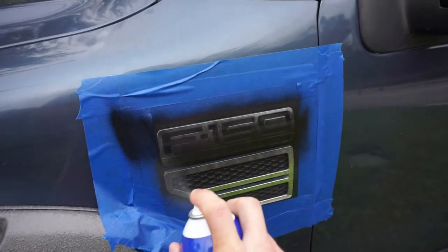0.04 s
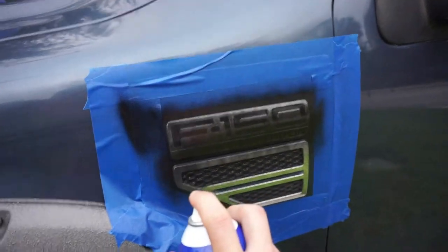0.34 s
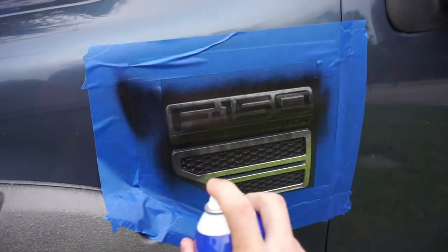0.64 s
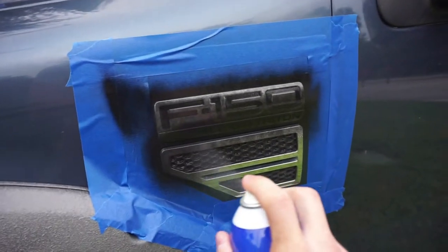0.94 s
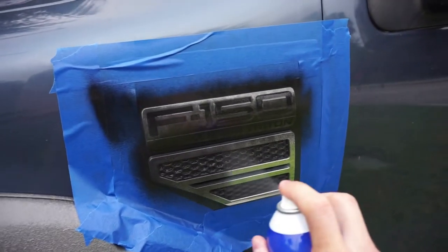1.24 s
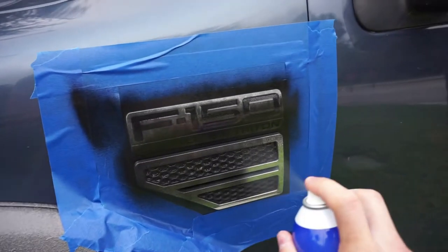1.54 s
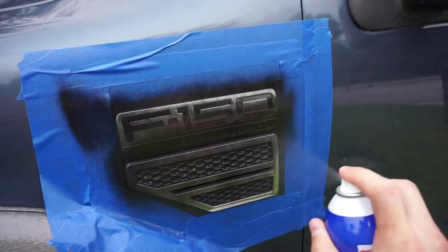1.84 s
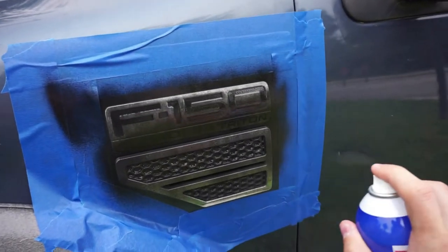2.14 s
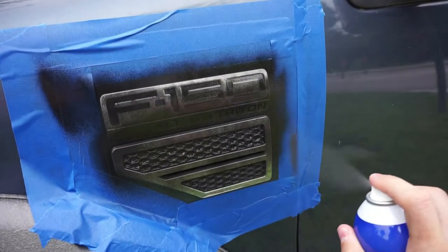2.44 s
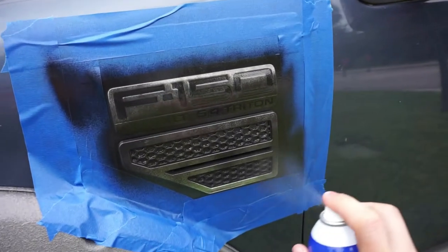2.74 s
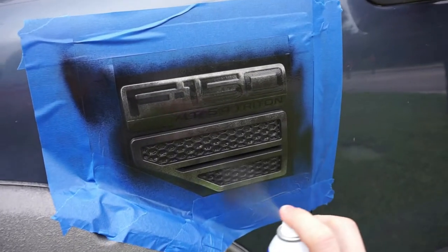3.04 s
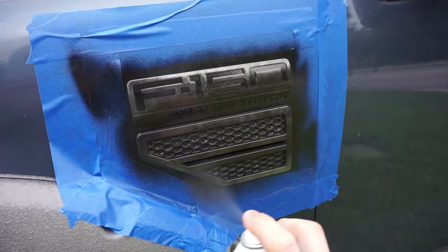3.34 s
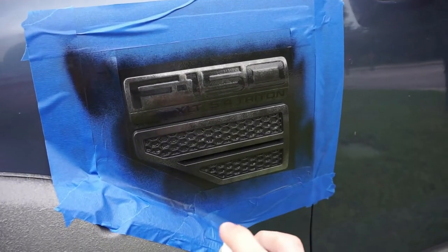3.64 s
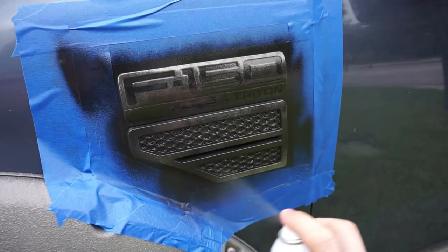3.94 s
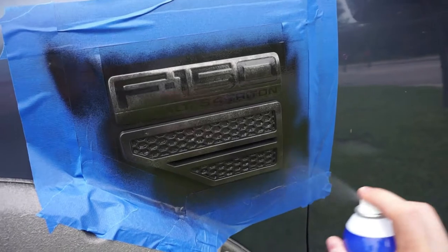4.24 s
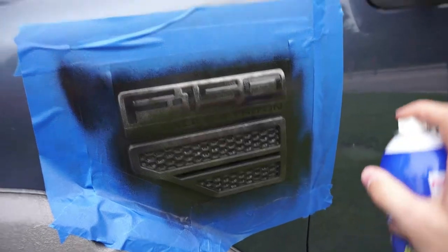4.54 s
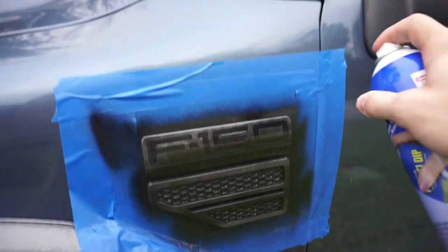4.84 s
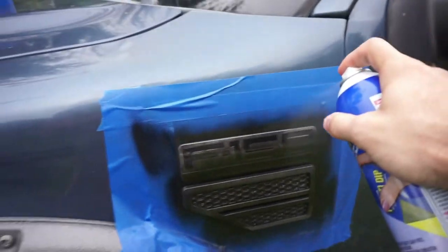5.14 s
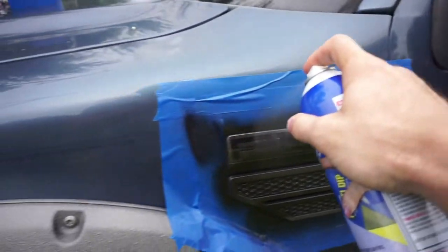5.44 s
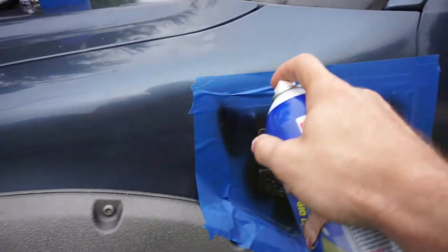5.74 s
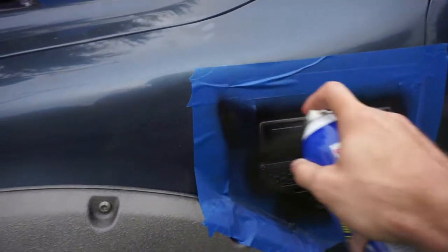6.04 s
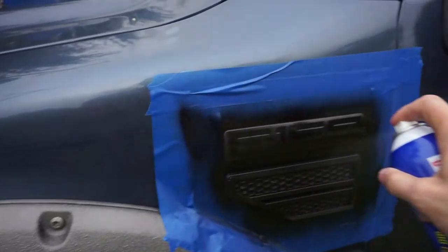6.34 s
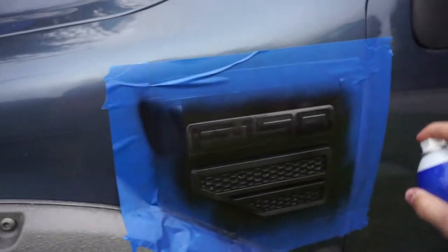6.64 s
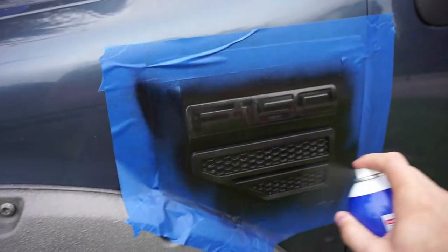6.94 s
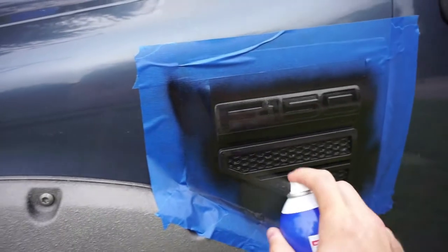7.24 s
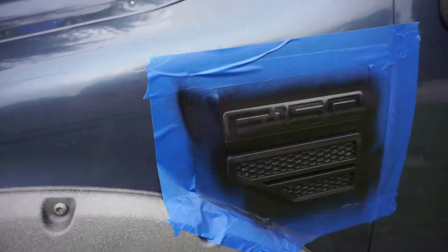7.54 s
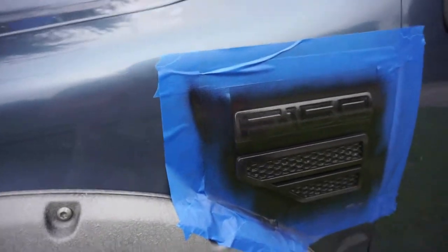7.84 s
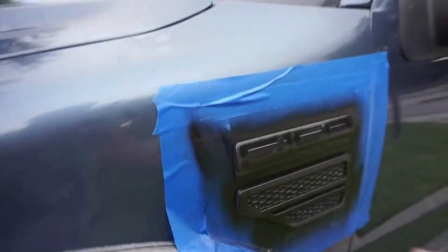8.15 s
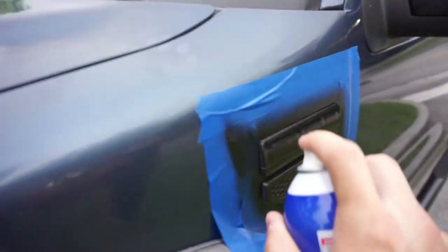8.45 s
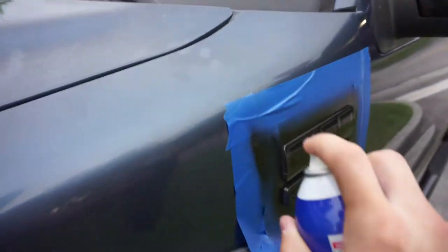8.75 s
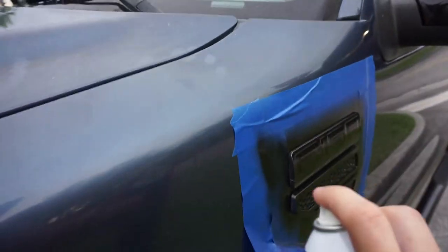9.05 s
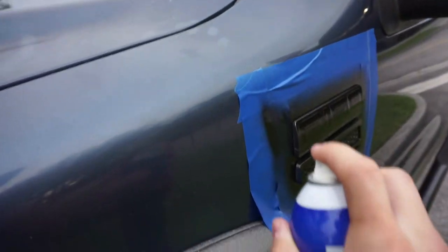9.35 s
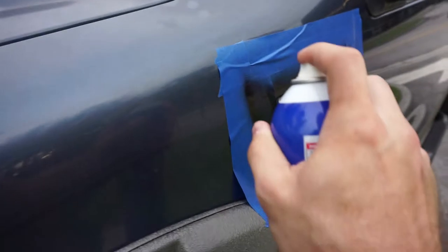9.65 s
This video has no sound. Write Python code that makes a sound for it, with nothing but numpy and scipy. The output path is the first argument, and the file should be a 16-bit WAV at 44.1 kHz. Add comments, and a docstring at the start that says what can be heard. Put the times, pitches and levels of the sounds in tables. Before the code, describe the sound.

An aerosol can sprays outdoors in repeated close hissing bursts, its mixing ball rattling briefly before one last short spray.

```python
"""Spraying a car badge outdoors

An aerosol can coats a car's side badge in eight close, hissing bursts. The jet hisses at the nozzle,
rushes where it lands and reflects off the body panel, so its colour sweeps as the hand moves.
Before the last burst the can is tipped and its mixing ball knocks about. Behind it are distant
traffic, soft rustling, an insect and one puff of wind on the microphone."""
import sys
import numpy as np
from scipy import signal
from scipy.fft import rfft, irfft, next_fast_len
from scipy.io import wavfile
from scipy.ndimage import map_coordinates

SR = 44100
rng = np.random.default_rng(int(sys.argv[2]) if len(sys.argv) > 2 else 0)


def store_pcm(level_fs):
    """Save levels as 16-bit WAV."""
    pcm = np.round(np.clip(level_fs, -1, 1) * 32767).astype(np.int16)
    wavfile.write(sys.argv[1], SR, np.atleast_2d(pcm).T)


N = 427769
TIME = np.arange(N) / SR

# One sweep of the hand per press; rises span the sweep, positive pan is left: open_s, close_s, hiss_db,
# hiss_rise_db, rush_db, rush_rise_db, pan_db, pan_rise_db, fineness_db, can_ring_db
PRESSES = [(-.05, 0.125, -26, -3, -44, 5.5, -3, 0, .5, -43),
           (.627, 2.011, -25, 0, -42.5, -.5, -5.5, -4.5, 0.5, -45.5),
           (2.35, 3.484, -26, 4.5, -43, 2.5, -5.5, 5.5, -2, -47),
           (3.71, 4.284, -26, -4, -43.5, -7, -5, -2, -1.5, -50.5),
           (4.874, 5.586, -27, -3, -47.5, 0.5, -8.5, 3.5, -2.5, -50.5),
           (5.883, 6.466, -27.5, 4.5, -47, -6.5, -8.5, -4, 0, -52),
           (6.749, 7.257, -29, 6.5, -48, 5, -8, 6.5, 5, -50),
           (9.681, 9.79, -33.5, 1, -43, 4, -4, 0, -1, -57)]
# How alike left and right are, for the can and for the background: frequency_hz, correlation
CAN_CORRELATION = [(300, 0.84), (1000, 1), (2000, 0.59), (4000, 0.42), (8000, 0.23), (15000, 0.32)]
AIR_CORRELATION = [(50, .86), (250, .83), (700, .72), (2000, .4), (8000, .15)]


def from_db(db):
    """Decibels to gain."""
    return 10 ** (np.asarray(db) / 20)


def in_time(rows):
    """Curves at every sample, from rows that begin with a time in seconds."""
    time_s, *columns = np.transpose(rows)
    return [np.interp(TIME, time_s, column) for column in columns]


def at_hz(points, hz):
    """Read a curve on a log-frequency axis."""
    point_hz, value = np.transpose(points)
    return np.interp(np.log(hz + 1), np.log(point_hz), value)


def panned(pan_db):
    """Left and right gains at constant power; positive leans left."""
    gains = from_db(np.array([[.5], [-.5]]) * pan_db)
    return gains / np.sqrt(np.mean(gains ** 2, axis=0))


def drift(rate_hz):
    """A random wander of unit rms, mostly slower than the given rate."""
    size = next_fast_len(N)
    hz = np.fft.rfftfreq(size, 1 / SR)
    wander = irfft(rfft(rng.standard_normal(size)) / (1 + (hz / rate_hz) ** 2), size)[:N]
    return wander / np.sqrt(np.mean(wander ** 2) + 1e-20)


def noise(spectrum, correlation):
    """Coloured stereo noise, rolling off past the spectrum's ends; its mid signal has unit rms."""
    size = next_fast_len(N)
    hz = np.fft.rfftfreq(size, 1 / SR)
    rolloff = np.minimum(1, hz / spectrum[0][0]) ** 2 / np.maximum(1, hz / spectrum[-1][0]) ** 2
    colour = rolloff * from_db(at_hz(spectrum, hz))
    alike = np.clip(at_hz(correlation, hz), -.99, .99)
    white = rfft(rng.standard_normal((2, size)))
    mid, side = irfft(white * np.sqrt([1 + alike, 1 - alike]) * colour, size)[:, :N]
    return np.array([mid + side, mid - side]) / np.std(mid)


def gate(start_s, end_s, rise_s, fall_s):
    """An envelope that builds from its start and dies away after its end."""
    rising = 1 - np.exp(-np.maximum(TIME - start_s, 0) / rise_s)
    return rising * np.exp(-np.clip((TIME - end_s) / fall_s, 0, 20))


def delayed(x, lag_ms):
    """One channel through a moving delay."""
    return map_coordinates(x, [np.arange(N) - lag_ms * SR / 1000], order=3)


def scatter(x, t60_s, level_db):
    """A dying cloud of small reflections, different in each channel."""
    t = np.arange(int(t60_s * SR) + 2) / SR
    cloud = rng.standard_normal((2, len(t))) * np.exp(-np.log(1000) * t / t60_s)
    cloud /= np.linalg.norm(cloud, axis=1, keepdims=True)
    return from_db(level_db) * signal.fftconvolve(x, cloud, axes=1)[:, :N]


def spray(hiss_trim_db=-3, sheen_trim_db=.5, body_trim_db=.1, rush_trim_db=3.5):
    """Nozzle hiss, jet body, landing rush and the can's ring start and stop with the valve."""
    # The colour of each layer: frequency_hz, density_db
    hiss_spectrum = [(3000, -52), (6000, -6.5), (7500, -2), (8700, 1.5), (10000, 3.5), (11500, 2.5),
                     (12800, -1.5), (16000, -39)]
    sheen_spectrum = [(10000, -17), (11500, -9), (12500, -6), (14000, -3.5), (16000, -5.5)]
    body_spectrum = [(1200, -17), (2200, -10), (2650, -3), (3300, -2.5), (4200, 1), (5300, 2), (6500, -1),
                     (8000, -1), (12000, -21.5)]
    rush_spectrum = [(100, -9), (350, -7.5), (550, -3), (800, 0.5), (1300, -4.5), (1700, -8.5), (2300, -3),
                     (3200, -17), (6000, -42.5)]
    ring_spectrum = [(1200, -16), (1500, -13.5), (1850, -9), (2060, -1.5), (2250, -18), (2750, -14),
                     (3200, -31)]
    hiss_db, rush_db, pan_db, fineness_db, ring_db = hand_sweeps()
    body_db = hiss_db + .55 * (rush_db - hiss_db)
    valve = sum(gate(open_s, close_s, rise_s=.011, fall_s=.0068) for open_s, close_s, *_ in PRESSES)
    # A finer mist moves the hiss up into the topmost treble.
    jet = from_db(hiss_db + hiss_trim_db - fineness_db / 2) * noise(hiss_spectrum, CAN_CORRELATION)
    jet += from_db(hiss_db + sheen_trim_db + fineness_db / 2) * noise(sheen_spectrum, CAN_CORRELATION)
    jet += from_db(body_db + body_trim_db) * noise(body_spectrum, CAN_CORRELATION)
    rush = from_db(rush_db + rush_trim_db) * noise(rush_spectrum, CAN_CORRELATION)
    ring = from_db(ring_db) * noise(ring_spectrum, CAN_CORRELATION)
    # The liquid tears into droplets unevenly, which roughens the hiss.
    sputter_db, flutter_db = 1.24 * drift(590), .59 * drift(16.7)
    return valve * (from_db(sputter_db + flutter_db) * jet + rush + ring) * panned(pan_db)


def hand_sweeps(ends_db=-1.3):
    """Hiss, rush and pan glide through each press, the jet weaker at both ends; fineness and ring hold."""
    rows = []
    for open_s, close_s, hiss, hiss_rise, rush, rush_rise, pan, pan_rise, fineness, ring in PRESSES:
        for position in np.linspace(-.5, .5, 9):
            time_s = open_s + (position + .5) * (close_s - open_s)
            arch_db = ends_db * (2 * position) ** 2
            hiss_db = hiss + hiss_rise * position + arch_db
            rush_db = rush + rush_rise * position + arch_db
            rows.append((time_s, hiss_db, rush_db, pan + pan_rise * position, fineness, ring))
    return in_time(rows)


def camera_shadow(x):
    """The camera body shades the left microphone port in the upper mids; lows and highs lean left."""
    # Added lean to the left: frequency_hz, pan_db
    lean = [(500, 8.5), (800, 2), (1200, 3), (1900, -2.5), (2800, -3.5), (4500, 1), (8000, 3.5), (15000, 1)]
    size = next_fast_len(N)
    pan_db = at_hz(lean, np.fft.rfftfreq(size, 1 / SR))
    return irfft(rfft(x, size) * panned(pan_db), size)[:, :N]


def reflections(x, port_lag_ms=.012, stray_count=4, stray_gain=.22, sway_ms=.065):
    """A moving comb: one strong reflection off the panel and weaker strays off hand, can and camera."""
    # The panel's reflection, sooner as the can comes closer to it: time_s, lag_ms
    panel_lag = [(0.06, .737), (.75, .797), (1.3, .784), (1.9, .742), (2.8, .67), (3.4, .71), (4.0, .628),
                 (4.95, .605), (5.52, .672), (5.97, .593), (6.85, .476), (7.2, .5)]
    panel_ms, = in_time(panel_lag)
    port_lags_ms = panel_ms - port_lag_ms, panel_ms + port_lag_ms
    channels = []
    for direct, lag_ms, panel_gain in zip(x, port_lags_ms, (.4, .44)):
        combed = direct + panel_gain * delayed(direct, lag_ms)
        hand_ms = lag_ms - np.mean(lag_ms)
        for stray_ms, sign in zip(rng.uniform(1.1, 3.6, stray_count), rng.choice([-1, 1], stray_count)):
            combed += sign * stray_gain * delayed(direct, stray_ms + hand_ms + sway_ms * drift(.96))
        channels.append(combed / np.sqrt(1 + panel_gain ** 2 + stray_count * stray_gain ** 2))
    return np.array(channels)


def traffic_and_air(rumble_trim_db=2, air_trim_db=-.8, rustle_trim_db=-3.5):
    """Distant traffic rumbles with a wavering engine hum, under murmuring air and a high rustle."""
    # The traffic's ebb and flow: time_s, level_db
    traffic_levels = [(0, -52), (3.6, -52.5), (4.8, -53), (5.7, -56), (7.6, -59), (8.7, -54.5),
                      (9.6, -56.5)]
    # A far engine's partials: pitch_hz, relative_level_db
    hum_partials = [(104, -5), (208, -8.5)]
    # The colour of each layer: frequency_hz, density_db
    rumble_spectrum = [(20, -24), (40, -2), (70, -0.5), (105, -2), (150, -1.5), (220, 2), (330, -4.5),
                       (480, -7), (700, -9), (1500, -24)]
    air_spectrum = [(200, -2.5), (350, -1), (440, 2), (600, -5.5), (850, -0.5), (1020, -4), (1250, 1),
                    (1750, -6), (2450, -4.5), (3400, -12.5), (5000, -18.5), (8000, -13.5), (16000, -22)]
    rustle_spectrum = [(1500, -3), (3000, -7), (6000, -7), (8500, -5.5), (11200, 0), (13000, -3.5),
                       (14800, -3), (16000, -1.5)]
    traffic_db, = in_time(traffic_levels)
    air_db, rustle_db = stirrings(traffic_db)
    out = from_db(traffic_db + rumble_trim_db) * noise(rumble_spectrum, AIR_CORRELATION)
    out += from_db(air_db + air_trim_db) * noise(air_spectrum, AIR_CORRELATION) * panned(-1.9)
    out += from_db(rustle_db + rustle_trim_db) * noise(rustle_spectrum, AIR_CORRELATION) * panned(-2.4)
    engine_time = np.cumsum(1 + .0123 * drift(3.7)) / SR
    for pitch_hz, partial_db in hum_partials:
        hum_db = traffic_db + partial_db - .5 * drift(2.7)
        out += from_db(hum_db) * np.sin(2 * np.pi * pitch_hz * engine_time)
    return out


def stirrings(traffic_db, air_offset_db=-7.5, rustle_floor_db=-76, linger_db=-54, linger_s=.11):
    """Air and rustle levels in dB: a floor, a soft hiss that outlasts each press and a few swells."""
    # Soft swells of rustling: middle_s, half_length_s, air_db, rustle_db
    swells = [(0.363, 0.35, -54.5, -55.5), (3.622, 0.2, -52, -85), (4.536, 0.26, -48.5, -50),
              (5.77, 0.23, -55.5, -76), (7.764, 0.18, -50.5, -48.5), (8.237, 0.44, -49.5, -60),
              (8.98, 0.16, -52.5, -51.5)]
    linger = sum(gate(open_s, close_s, linger_s, linger_s) for open_s, close_s, *_ in PRESSES)
    linger_power = (from_db(linger_db) * linger) ** 2
    air_power = from_db(traffic_db + air_offset_db) ** 2 + linger_power
    rustle_power = from_db(rustle_floor_db) ** 2 + linger_power
    for middle_s, half_length_s, air_db, rustle_db in swells:
        swell = np.exp(-np.minimum(((TIME - middle_s) / half_length_s) ** 2, 20))
        air_power += (from_db(air_db) * swell) ** 2
        rustle_power += (from_db(rustle_db) * swell) ** 2
    return 10 * np.log10([air_power, rustle_power])


def insect(chirp_s=.13, pulse_hz=31, pulse_depth=.35, chorus_db=-73):
    """Short pulsing chirps of a thin, high buzz over a faint chorus of farther insects."""
    # The near insect's phrases: start_s, level_db
    chirps = [(.325, -53.5), (2.203, -56), (3.592, -55), (4.43, -59), (4.705, -52.5), (5.6, -53.5),
              (6.45, -56.5), (7.96, -69), (8.376, -67.5), (8.84, -65), (9.285, -63)]
    # The near buzz and the far chorus: frequency_hz, density_db
    buzz_spectrum = [(7200, -32), (7500, -15), (7720, 6), (7930, -17), (8200, -30)]
    chorus_spectrum = [(5500, -13.5), (6100, -15), (6800, -19), (7600, -2), (8300, -20.5), (8950, -11),
                       (9600, -22.5)]
    phrases = sum(from_db(level_db) * gate(start_s, start_s + chirp_s, rise_s=.02, fall_s=.015)
                  for start_s, level_db in chirps)
    pulse_time = np.cumsum(1 + .069 * drift(5.6)) / SR
    pulses = 1 + pulse_depth * np.sin(2 * np.pi * pulse_hz * pulse_time)
    buzz = phrases * pulses * noise(buzz_spectrum, AIR_CORRELATION)
    return buzz + from_db(chorus_db) * noise(chorus_spectrum, AIR_CORRELATION)


def mixing_ball(wall_trim_db=-4, base_trim_db=-5, scuff_trim_db=-7.5, scuff_s=.0017, low_cut_hz=520):
    """At each contact the ball scuffs the metal for a moment and sets wall and base ringing."""
    # Modes of the liquid-damped wall and of the pinging base: pitch_hz, level_db, t60_s
    wall_modes = [(586, -36, 0.024), (907, -14, 0.032), (1960, -6, 0.024), (2203, -5.5, 0.029),
                  (2550, -13, 0.018), (3340, -18, 0.021), (5400, -14, 0.02), (6300, -15.5, 0.035),
                  (7480, -14.5, 0.03), (8400, -34, 0.013), (8290, -7, 0.021), (8700, -10, 0.036),
                  (11000, -28, 0.017), (11900, -13, .015), (13100, -31, 0.013)]
    base_modes = [(4330, -2.5, 0.019), (4460, -5, 0.055), (9400, -3.5, 0.03)]
    # The scuff's colour: frequency_hz, density_db
    scuff_spectrum = [(650, -27), (900, 5), (1400, -9), (2200, 0), (3300, -5), (6000, -5), (8800, -4),
                      (11000, -8), (16000, -12)]
    start_s, level_db, hardness_db, ping_db = np.transpose(ball_contacts())
    starts = np.round(start_s * SR).astype(int)
    wall = struck_metal(wall_modes, starts, level_db + wall_trim_db, hardness_db)
    base = struck_metal(base_modes, starts, level_db + base_trim_db, ping_db)
    # The small can radiates little bass.
    rings = signal.sosfilt(signal.butter(2, low_cut_hz, "high", fs=SR, output="sos"), wall + base)
    impulses = np.zeros(N)
    impulses[starts] = from_db(level_db + hardness_db + scuff_trim_db)
    scuff_envelope = signal.lfilter([1], [1, -np.exp(-1 / (scuff_s * SR))], impulses + 1e-18)
    scuffs = scuff_envelope * noise(scuff_spectrum, CAN_CORRELATION)
    direct = (rings + scuffs) * panned(-5.5)
    return direct + scatter(direct, t60_s=.025, level_db=-4)  # hand and panel are centimetres away


def ball_contacts(bounce_s=.0112, softer_db=17, loss_db=2, harder_db=13.5):
    """The ball's knocks, plus a rattle: a run of light, hard bounces, each weaker than the last."""
    # The ball on the can's wall: start_s, level_db, hardness_db, ping_db, rattle_s
    knocks = [(7.5609, -13.5, -7.5, -3, .07), (7.6504, -14.5, -5, -2.5, 0), (7.6944, -33.5, 4, -22, 0),
              (7.801, -25, 8, -26, 0), (7.8581, -24, 3.5, -24, 0), (7.9299, -16, 1, -26, 0),
              (7.9384, -20, 0.5, -12, 0), (8.0406, -7.5, -7, -30, 0), (8.103, -43, -18, -26, 0),
              (8.16, -21.5, -9, -26, 0), (8.1646, -18.5, -3, -19, 0), (8.2142, -30, -7, -26, 0),
              (8.2195, -30, -4, -26, 0), (8.245, -32.5, -4, -26, 0), (8.6065, -29.5, -12, -29, 0),
              (8.6112, -28, -15, -29, 0)]
    contacts = [knock[:4] for knock in knocks]
    for start_s, level_db, hardness_db, ping_db, rattle_s in knocks:
        for k in range(int(rattle_s / bounce_s)):
            bounce_db = level_db - softer_db - k * loss_db
            contacts.append((start_s + (k + 1) * bounce_s, bounce_db, hardness_db + harder_db, ping_db))
    return contacts


def struck_metal(modes, starts, levels_db, trebles_db, treble_hz=3000, spread_db=2, detune=.013):
    """Every knock rings each mode with its own strength; the shifting liquid detunes them a little."""
    pitch_hz, mode_db, t60_s = np.transpose(modes)[:, :, None]
    t = np.arange(SR // 10) / SR
    decay = np.exp(-np.log(1000) * t / t60_s)
    out = np.zeros(N + SR)
    for start, level_db, treble_db in zip(starts, levels_db, trebles_db):
        strength, shift, polarity = rng.standard_normal((3, len(modes), 1))
        gains = from_db(level_db + mode_db + treble_db * (pitch_hz > treble_hz) + spread_db * strength)
        tones = np.sign(polarity) * np.sin(2 * np.pi * pitch_hz * (1 + detune * shift) * t)
        out[start:start + len(t)] += np.sum(gains * tones * decay, axis=0)
    return out[:N]


def wind_puff():
    """Each eddy pushes and then pulls on the microphone."""
    # The eddies of one puff: middle_s, level_db, frequency_hz
    eddies = [(9.087, -33, 65), (9.115, -31, 110), (9.135, -28, 122), (9.153, -37, 150), (9.176, -34.5, 80)]
    pressure = np.zeros(N)
    for middle_s, level_db, frequency_hz in eddies:
        phase = 2 * np.pi * frequency_hz * (TIME - middle_s)
        pressure -= from_db(level_db) * phase * np.exp((1 - phase ** 2) / 2)
    return pressure * panned(1)


def scene():
    """The can, with a faint outdoor echo, in its surroundings."""
    can = reflections(camera_shadow(spray())) + mixing_ball()
    echo = scatter(can, t60_s=.052, level_db=-30)
    return can + echo + traffic_and_air() + insect() + wind_puff()


def record(dry, cutoff_hz=15800):
    """A steep low-pass cuts the very top."""
    return signal.sosfilt(signal.ellip(12, .1, 80, cutoff_hz, fs=SR, output="sos"), dry)


dry = scene()
out = record(dry)
store_pcm(out)
```